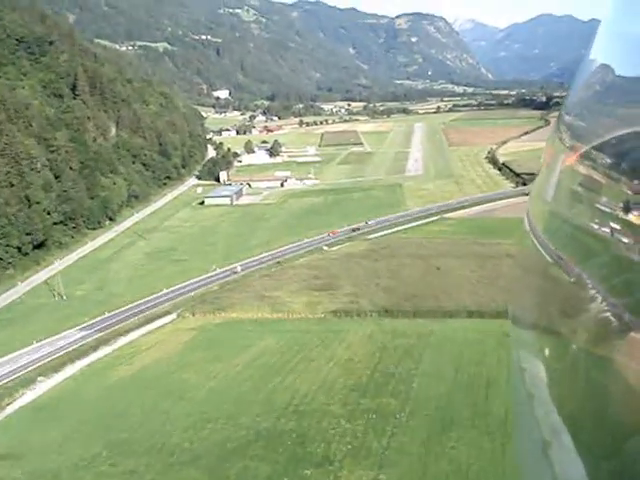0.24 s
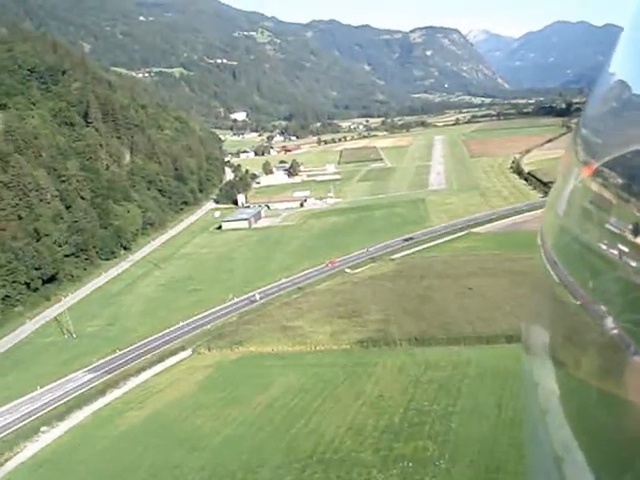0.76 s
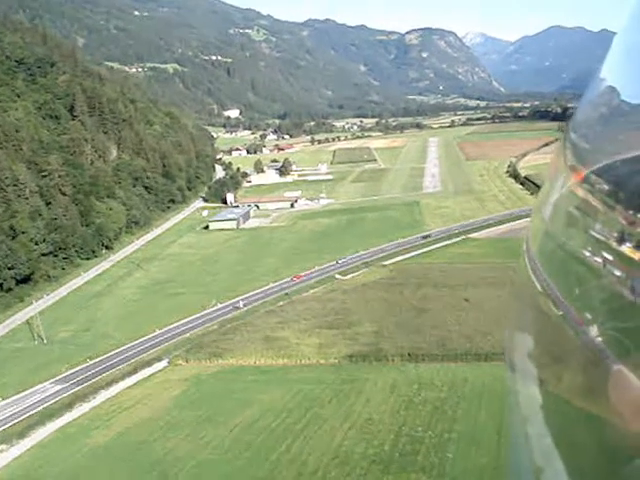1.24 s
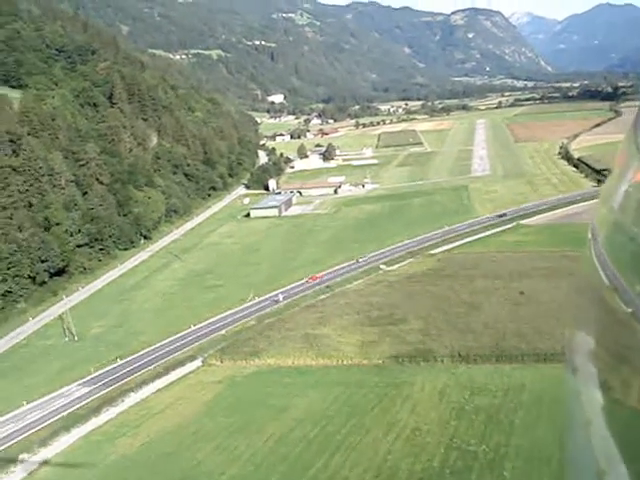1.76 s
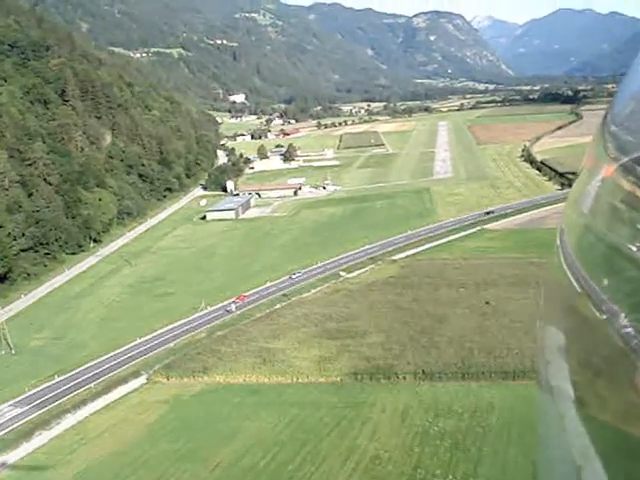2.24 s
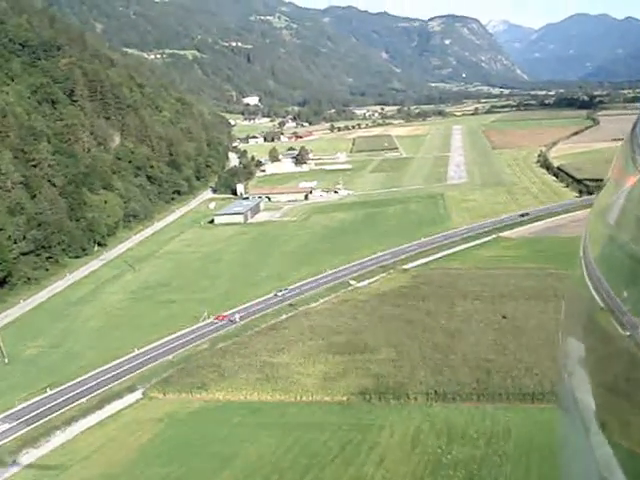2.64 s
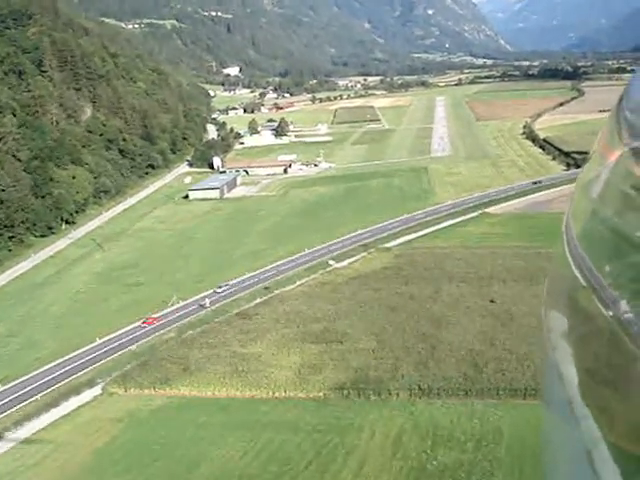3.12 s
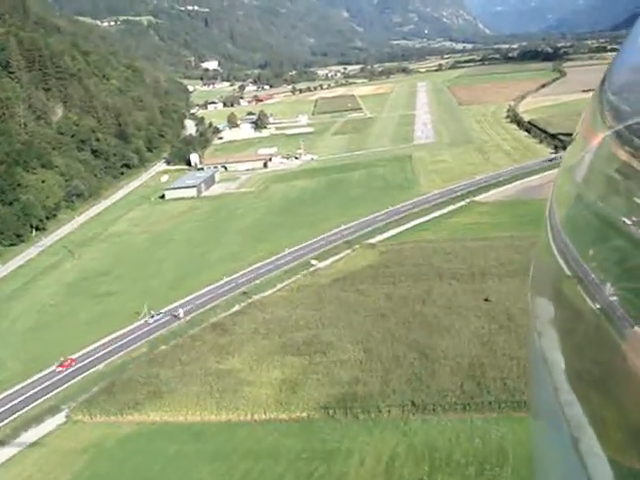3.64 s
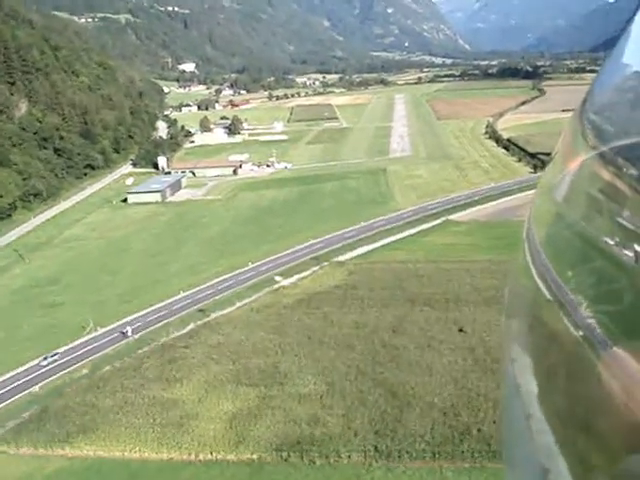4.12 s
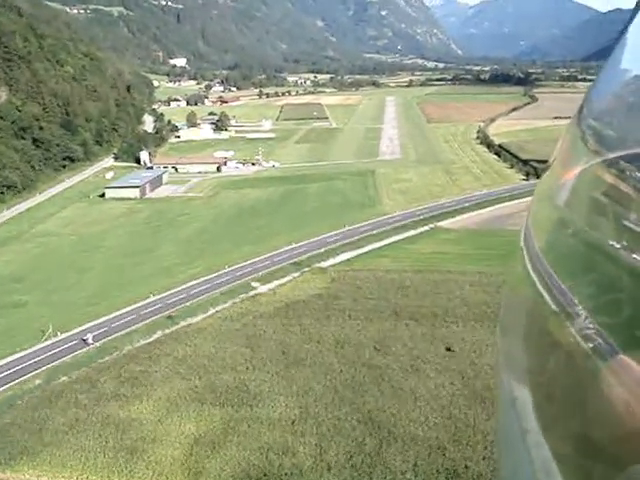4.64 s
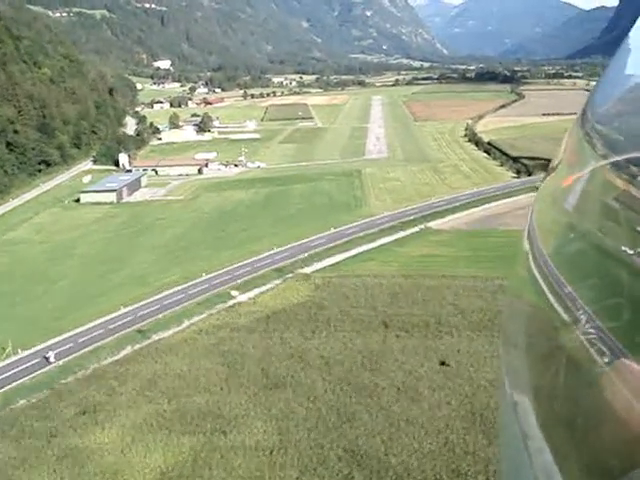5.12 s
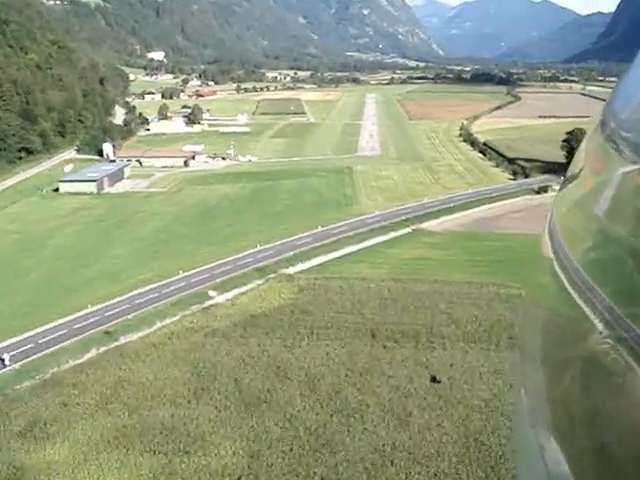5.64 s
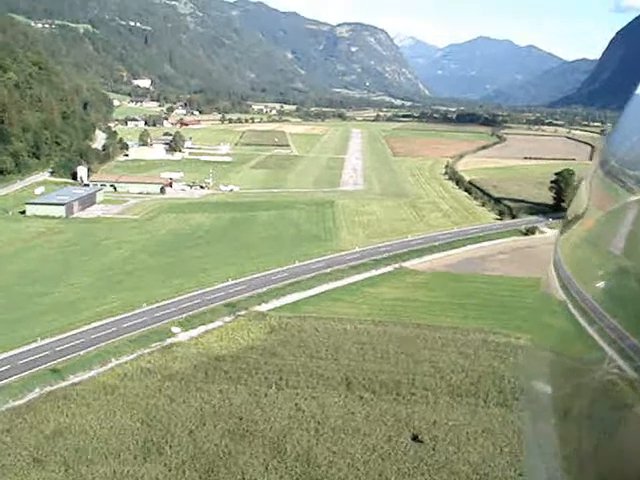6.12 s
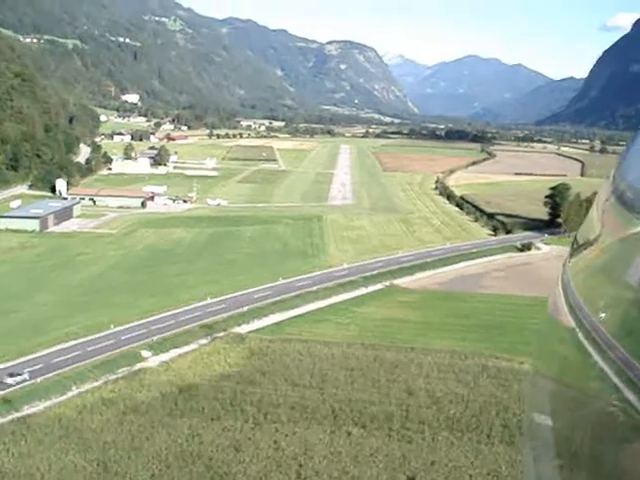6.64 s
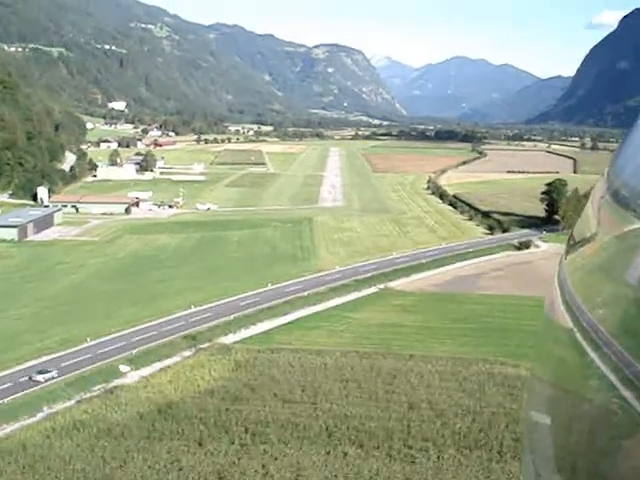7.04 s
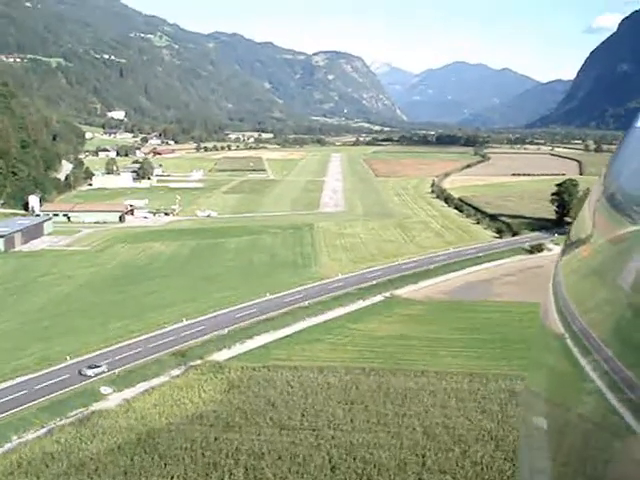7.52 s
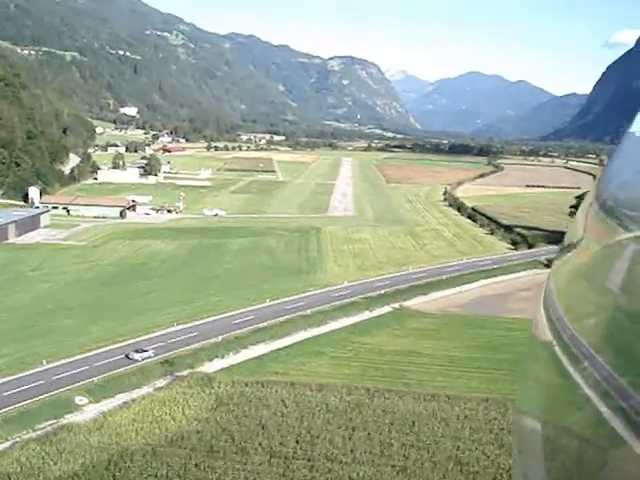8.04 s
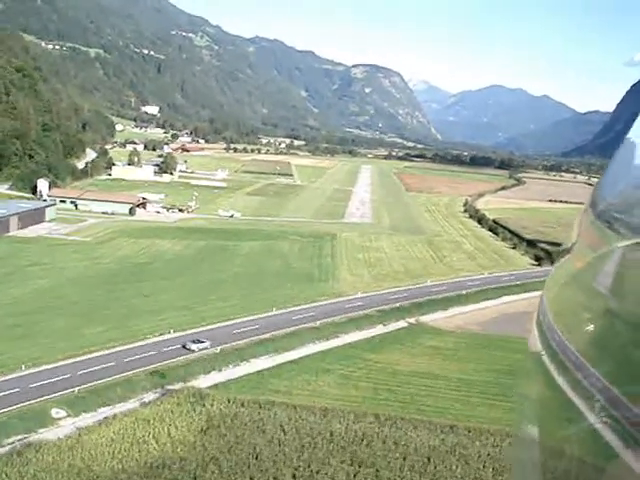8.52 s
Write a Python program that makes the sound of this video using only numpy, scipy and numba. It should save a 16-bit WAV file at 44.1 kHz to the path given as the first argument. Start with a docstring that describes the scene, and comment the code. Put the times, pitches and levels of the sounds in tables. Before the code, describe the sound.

Continuous distorted air rush past a glider in flight, bright and hissy at first, surging briefly, then sagging into a duller, stronger roar.

```python
"""Air rushes past a small camera microphone on a glider in flight: noise bands overload its amplifier.
At first the eddies pass fast, fine turbulence is strong and the low roar weak. Near 2.65 s the rate drops
and the roar surges; by 3.4 s the rate is back up. Then it sinks unevenly to its lowest near 6.75 s, with
less fine turbulence and a strong roar, and ends slightly higher. Throughout, the amplifier squares the
wave and the recorder thins its bass. Mono."""
import sys
import numpy as np
from scipy import signal
from scipy.fft import rfft, irfft
from scipy.io import wavfile
from scipy.ndimage import uniform_filter1d
from numba import njit

SR = 44100
rng = np.random.default_rng(int(sys.argv[2]) if len(sys.argv) > 2 else 0)


def generate_wav(sig):
    """Save sig (samples, or channels by samples) to the path in sys.argv[1] as 16-bit PCM at SR."""
    pcm = np.round(np.clip(np.atleast_2d(sig).T, -1, 1) * 32767).astype(np.int16)
    wavfile.write(sys.argv[1], SR, pcm)


N = 387198

# Steady rumble of the airframe. Each row: mean centre in Hz, level in dB.
RUMBLE_BANDS = [(70, -28), (160, -20.5)]
# Low roar, probably air shed by the fuselage. Each row: mean centre in Hz, level in dB before AIRFLOW's.
ROAR_BANDS = [(240, -9), (360, -2.5), (520, 2), (700, 1.5)]
# Fine turbulence at the microphone opening. Each row: mean centre in Hz, level in dB before its swell.
FINE_BANDS = [(2400, -9), (3600, -13), (5400, -17.5), (8000, -31)]
# Main eddies. Each row: multiple of the passing rate, level in dB.
EDDY_BANDS = [(.5, -4), (.7, -1.5), (.95, 0), (1.3, -7)]
# Course of the airflow. Each row: time in seconds, mean eddy passing rate in Hz, low roar level in dB.
AIRFLOW = [(0.0, 1780, -10), (0.4, 1700, -11), (0.75, 1740, -11), (1.2, 1670, -11.5), (1.55, 1860, -13),
           (1.85, 1540, -9.5), (2.45, 1590, -12), (2.65, 1400, -4), (3.0, 1410, -9.5), (3.39, 1730, -7.5),
           (3.6, 1590, -5.5), (4.2, 1530, -4), (4.5, 1630, -5), (5.4, 1323, -4), (5.8, 1445, -5.5),
           (6.75, 1194, -4), (7.55, 1210, -3), (7.85, 1340, -5), (8.05, 1240, -5.5), (8.78, 1330, -4.5)]
# Rough hiss on the squared wave. Each row: centre in Hz, level in dB before the recorder, flicker in dB.
HISS_BANDS = [(3000, -32, 3), (4600, -33, 3), (6500, -35, 2.5), (9500, -35, 1.5), (15000, -33, .6)]
# Recorder colour. Each row: frequency in Hz, gain in dB.
RECORDER_COLOUR = [(20, -0.5), (120, -1), (400, -1), (2000, -1.5), (5000, -5), (8000, -8), (10700, -8.5),
                   (11200, -9), (11700, -14), (12400, -12), (12900, -10), (13400, -4.5), (16000, -6)]

# Fine turbulence grows with the passing rate; the level is the one at the reference rate.
FINE_DB, FINE_DB_PER_OCTAVE, FINE_REFERENCE_HZ = 0.3, 18.5, 1500
# Random swells of roar and fine turbulence: approximate spreads, changes per second.
ROAR_SWELL_DB, FINE_SWELL_DB, SWELLS_PER_S = 1.53, 1.3, 7
DRIVE_DB = 3.5  # rms into the amplifier
RAIL_UP, RAIL_DOWN, KNEE = 0.45, 0.37, 3.0  # amplifier limits and sharpness of the bend
BASS_CUT_HZ, BASS_STOP_HZ = 815, 60  # bass falls below the first, levels off below the second
TOP_HZ = 15720


def undb(db):
    """dB to gain."""
    return 10 ** (np.asarray(db) / 20)


def level(x, db):
    """Set the rms level."""
    return x * undb(db) / np.sqrt(np.mean(x ** 2))


@njit
def svf(x, centre_hz, width_ratio):
    """State-variable band-pass with a moving centre; width_ratio = width / centre."""
    out, band_state, low_state = np.empty(len(x)), 0., 0.
    for i in range(len(x)):
        g = np.tan(np.pi * centre_hz[i] / SR)
        v = (band_state + g * (x[i] - low_state)) / (1 + g * (g + width_ratio))
        band_state = 2 * v - band_state
        low_state = low_state + 2 * g * v
        out[i] = width_ratio * v
    return out


def walk(changes_per_s):
    """Random levels, held one change period and slewed twice; spread near 1."""
    hold = int(SR / changes_per_s)
    steps = np.repeat(rng.standard_normal(N // hold + 1), hold)
    slewed = uniform_filter1d(uniform_filter1d(steps, hold), hold)
    return 1.21 * slewed[:N]


def band(centre_hz, db, flicker_db, flickers_per_s):
    """Noise through two equal band-passes, flickering on its own about the set level."""
    once = svf(rng.standard_normal(N), centre_hz, 0.79)
    noise = svf(once, centre_hz, 0.79) / np.sqrt(centre_hz)  # evens the power as the centre slides
    return level(noise, db) * undb(flicker_db * walk(flickers_per_s))


def rumble(waver):
    """Airframe rumble: low bands that waver with the flow speed."""
    return sum(band(hz * waver, db, 0.8, 21) for hz, db in RUMBLE_BANDS)


def roar(waver, roar_db):
    """Low roar: bands apart from the passing rate that follow the roar level and swell at random."""
    bands = sum(band(hz * waver, db, 0.61, 18) for hz, db in ROAR_BANDS)
    return undb(roar_db + ROAR_SWELL_DB * walk(SWELLS_PER_S)) * bands


def fine_turbulence(waver, rate_hz):
    """Fine turbulence: fast-flickering high bands, louder as eddies pass faster."""
    octaves = np.log2(rate_hz / FINE_REFERENCE_HZ)
    fine_db = FINE_DB + FINE_DB_PER_OCTAVE * octaves + FINE_SWELL_DB * walk(SWELLS_PER_S)
    bands = sum(band(hz * waver, db, 3.44, 200) for hz, db in FINE_BANDS)
    return undb(fine_db) * bands


def main_eddies(waver, rate_hz):
    """Main eddies: bands that slide in pitch with the passing rate."""
    return sum(band(multiple * rate_hz * waver, db, 0.66, 18) for multiple, db in EDDY_BANDS)


def airflow():
    """Sum the pressures on the microphone; quick wavers of flow speed move all bands together."""
    time_s, *columns = np.transpose(AIRFLOW)
    rate_hz, roar_db = (np.interp(np.arange(N) / SR, time_s, c) for c in columns)
    waver = np.exp(0.028 * walk(25) + 0.081 * walk(80))
    pressure = rumble(waver) + roar(waver, roar_db)
    pressure = pressure + fine_turbulence(waver, rate_hz) + main_eddies(waver, rate_hz)
    return level(pressure, DRIVE_DB)


def scene():
    """One microphone feeds both channels."""
    return np.tile(airflow(), (2, 1))


def overload(dry):
    """Amplifier: bends the wave flat at unequal rails."""
    rail = np.where(dry > 0, RAIL_UP, RAIL_DOWN)
    return dry / (1 + np.abs(dry / rail) ** KNEE) ** (1 / KNEE)


def rough_hiss():
    """Hiss: fixed noise bands with rapid flicker."""
    return sum(band(np.full(N, 1. * hz), db, flicker_db, 160) for hz, db, flicker_db in HISS_BANDS)


def thin_bass(x):
    """A coupling capacitor lets each flat top sag back towards zero."""
    zero, pole = np.exp(-2 * np.pi * np.array([BASS_STOP_HZ, BASS_CUT_HZ]) / SR)
    return signal.lfilter([1, -zero], [1, -pole], x - x.mean())


def colour(x):
    """Recorder response, interpolated over log frequency."""
    hz = np.arange(N // 2 + 1) * SR / N + 1  # +1 avoids log(0)
    colour_hz, colour_db = np.transpose(RECORDER_COLOUR)
    gain = undb(np.interp(np.log(hz), np.log(colour_hz), colour_db))
    return irfft(rfft(x) * gain, N)


def record(dry):
    """Overload, rough hiss, bass cut, colour, steep top."""
    squared = overload(dry) + rough_hiss()
    coloured = colour(thin_bass(squared))
    steep_top = signal.ellip(14, 0.5, 60, TOP_HZ, fs=SR, output="sos")  # ripple dB, stop dB
    return signal.sosfilt(steep_top, coloured)


dry = scene()
out = record(dry)
generate_wav(out)
```